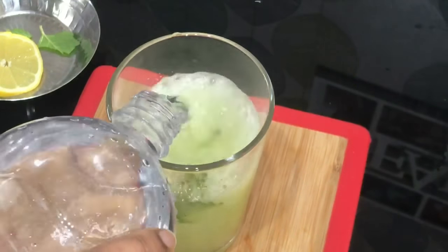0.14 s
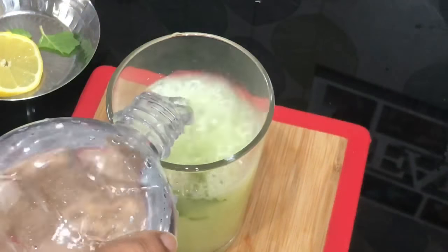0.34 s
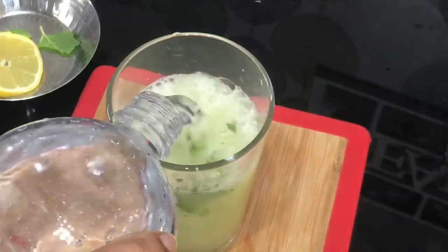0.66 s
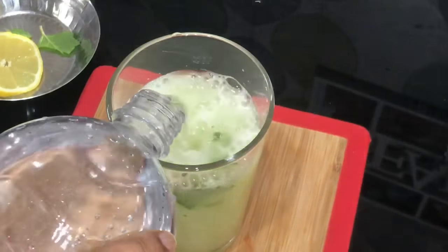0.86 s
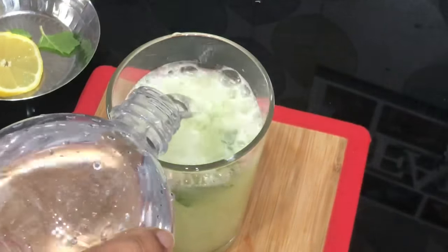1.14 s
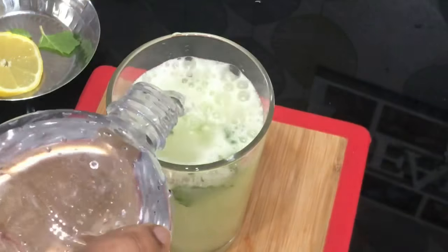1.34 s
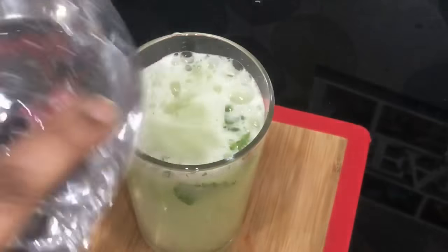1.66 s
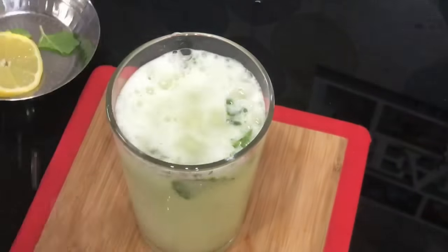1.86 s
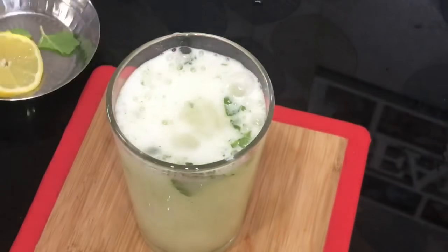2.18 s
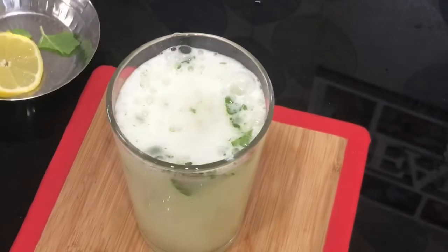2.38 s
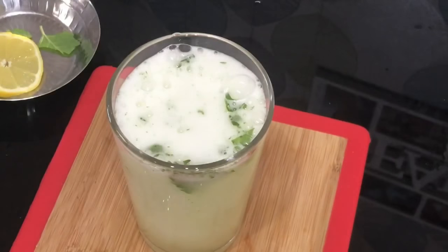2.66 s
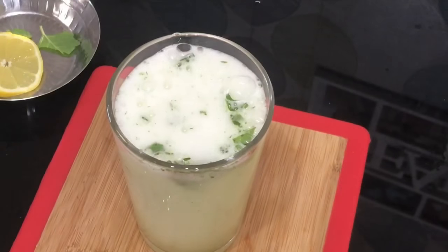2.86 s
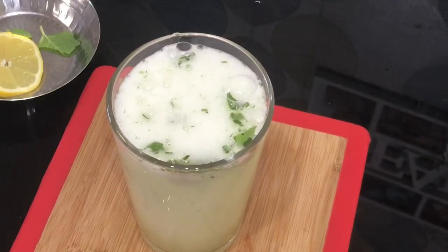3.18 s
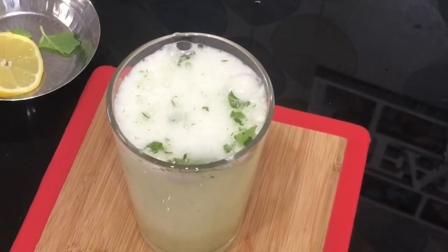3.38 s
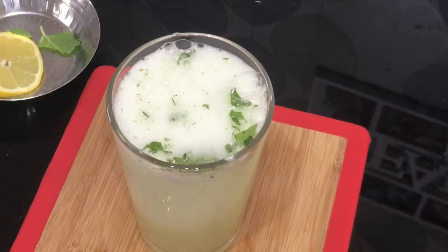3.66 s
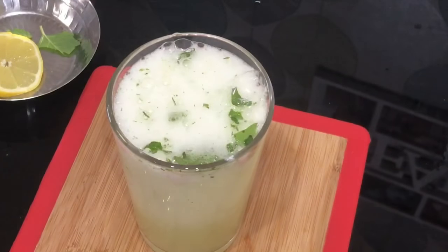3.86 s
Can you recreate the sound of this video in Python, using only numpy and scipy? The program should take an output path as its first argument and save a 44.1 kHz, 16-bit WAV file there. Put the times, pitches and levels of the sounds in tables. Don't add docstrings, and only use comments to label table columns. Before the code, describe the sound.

A soft plastic bottle pours sparkling water into a glass at arm's length: bubbly splash, droplets, soft hollow glugs, dents popping. Pouring stops, the foam head fizzes finely, and the handled bottle pops and knocks. Near the end come much louder crunching plastic cracks, with a short bright ring from hard tiles, over faint counter thumps and low kitchen rumble.

```python
import sys
import numpy as np
from scipy import signal
from scipy.fft import rfft, irfft
from scipy.io import wavfile
from scipy.ndimage import uniform_filter1d

SR = 44100
rng = np.random.default_rng(int(sys.argv[2]) if len(sys.argv) > 2 else 0)


def int16_out(signal):
    q = np.round(np.clip(np.atleast_2d(signal).T, -1, 1) * 32767)
    wavfile.write(sys.argv[1], SR, q.astype(np.int16))


def gain_from_db(level_db):
    decades = np.asarray(level_db, float) / 20
    return 10 ** decades


N = 177540


def unit(x):
    return x / np.sqrt(np.mean(x ** 2))


def peak_one(x):
    return x / np.abs(x).max()


def add(out, s, y):
    i = int(s * SR)
    out[i:i + len(y)] += y[:N - i]


def curve(tables, column=1, before=None, after=None):
    rows = np.concatenate(tables)
    return np.interp(np.arange(N) / SR, rows[:, 0], rows[:, column], before, after)


def swells(rows, rise=0.0012):
    t = np.arange(N) / SR
    gains = []
    for s, db, t60 in rows:
        age = np.maximum(t - s, 0)
        gains.append(gain_from_db(db - 60 * age / t60) * (1 - np.exp(-age / rise)))
    return np.max(gains, axis=0)


def colour(x, points):
    hz, db = np.transpose(points)
    f = np.maximum(np.arange(len(x) // 2 + 1) * SR / len(x), 1)
    gain = gain_from_db(np.interp(np.log(f), np.log(hz), db, left=-90, right=-90))
    return unit(irfft(rfft(x) * gain, len(x)))


def band(x, hz, spread):
    edges = [hz / spread, min(hz * spread, .45 * SR)]
    return signal.sosfilt(signal.butter(2, edges, "band", fs=SR, output="sos"), x)


def walk(rate):
    k = int(SR / rate)
    held = np.repeat(rng.standard_normal(N // k + 1), k)
    return uniform_filter1d(uniform_filter1d(held, k), k)[:N]


def grains(scatter_db):
    clicks = np.clip(rng.standard_normal(N), -2, 2)
    return clicks * gain_from_db(scatter_db * np.minimum(rng.exponential(size=N), 6))


def ring(modes, glide=0.):
    t = np.arange(SR // 2) / SR
    y = 0
    for hz, db, t60 in modes:
        bend = 1 + glide * np.minimum(t / t60, 1)
        y = y + gain_from_db(db - 60 * t / max(t60, 1e-3)) * np.sin(2 * np.pi * hz * t * bend)
    return peak_one(y)


def burst(t60, rise=0.0001):
    t = np.arange(SR // 4) / SR
    grit = rng.standard_normal(len(t)) * gain_from_db(3 * np.minimum(rng.exponential(size=len(t)), 5))
    y = unit(grit) * gain_from_db(-60 * t / max(t60, 1e-3)) * (1 - np.exp(-t / rise))
    y[8] += 6.
    return y


def wall_pops(events, wall):
    out, t = np.zeros(N), np.arange(SR // 2) / SR
    lucks = rng.standard_normal((len(events), 16))
    for (s, db, hz, t60, thump_db, snap_db), luck in zip(events, lucks):
        modes = [(f * (1 + 0.049 * a), g + 2 * b, d) for (f, g, d), a, b in zip(wall, luck, luck[8:])]
        thump = ring(modes + [(400.0, 2.4, 0.049)])
        tone = ring([(hz, 0, t60), (0.98 * hz, -6, 0.63 * t60)])
        onset = 1 - np.exp(-t / 0.0012)
        add(out, s - .0005, gain_from_db(db) * (gain_from_db(-2.5) * tone + gain_from_db(thump_db) * thump) * onset)
        crackle = band(burst(1.63 * t60), hz, 1.27)
        add(out, s - .0005, gain_from_db(db - 7) * peak_one(crackle))
        snap = band(band(burst(0.028, rise=0.001), 6000, 2.2), 6000, 2.2)
        add(out, s - .0003, gain_from_db(db + snap_db) * peak_one(snap))
    return out


# (time [s], peak [dB], pitch [Hz], thump [dB], snap [dB])
POUR_POPS = [(0.082, -29.5, 1180, -9.5, -6), (0.106, -29, 1105, -14, -28), (0.277, -29.5, 1084, 5.5, 4.5),
             (0.344, -29, 1204, -10, -15.5), (0.433, -39.5, 1180, 0.5, -14), (0.459, -42, 1090, -9, -25),
             (0.533, -45, 1620, -26, -2), (0.578, -42, 1300, -26, -2), (0.594, -37, 1440, -5.5, -2),
             (0.6999, -42, 2620, -32, -20), (0.844, -43, 2965, -27, -2), (0.873, -32, 1120, -11, -7.5),
             (0.932, -46, 1590, -13, -14), (1.015, -50, 1270, -26, 5), (1.05, -51, 1310, -22, 5),
             (1.107, -44, 1590, -24, -4), (1.134, -38.5, 1370, -5.5, -0.5), (1.189, -44.5, 1160, 0.5, -20),
             (1.222, -44, 1030, -20, -17), (1.236, -45, 1050, -5.5, -12), (1.475, -48.5, 2400, -37, -19)]
# (frequency [Hz], level [dB], t60 [s])
FULL_WALL = [(202.5, -1.5, 0.19), (345, -1, 0.17), (265, -2, 0.12), (426, -0.5, 0.09), (538, -17, 0.26),
             (643, -10, 0.15), (1346, -5, 0.048), (1400, -12, 0.082)]


def pouring_pops():
    ring_t60_s = 0.015
    rows = [(s, db, hz, ring_t60_s, thump_db, snap_db) for s, db, hz, thump_db, snap_db in POUR_POPS]
    return wall_pops(rows, FULL_WALL)


# (time [s], peak [dB], pitch [Hz], ring t60 [s], thump [dB])
LIFT_POPS = [(1.722, -62, 835, 0.02, 20.5), (1.749, -41.5, 1090, 0.012, -6.5),
             (1.777, -35, 1234, 0.0061, -21), (1.809, -30.5, 2170, 0.0062, -17),
             (1.913, -46, 4700, 0.012, -23), (1.942, -43, 3450, 0.022, 0), (1.949, -35.5, 1030, 0.034, -32),
             (2.0179, -26.5, 2020, 0.018, -21), (2.076, -32.5, 1520, 0.0089, -7),
             (2.1698, -31, 1240, 0.022, -44), (2.2, -43.5, 2054, 0.039, -21), (2.559, -37, 1225, 0.036, 4),
             (2.622, -44, 1590, 0.015, -5.5), (2.726, -51.5, 1360, 0.022, 0),
             (2.8431, -35.5, 1400, 0.0069, -1), (2.975, -41.5, 1400, 0.022, 2),
             (2.989, -32.5, 970, 0.0079, -7.5), (2.999, -39, 706, 0.008, -11)]
# (frequency [Hz], level [dB], t60 [s])
EMPTY_WALL = [(343.6, 12.5, 0.073), (230.7, 12.5, 0.07), (446.7, 10, 0.047), (588, -23, 0.054),
              (756, -8, 0.12), (954, 1.5, 0.1), (1460, -1, 0.12)]


def lifting_pops():
    turns_away_s, near_snap_db, far_snap_db = 2.05, -4, -22
    rows = [(*row, near_snap_db if row[0] < turns_away_s else far_snap_db) for row in LIFT_POPS]
    return wall_pops(rows, EMPTY_WALL)


# (time [s], peak [dB], pitch [Hz], length t60 [s], crunch [dB])
CREASE_POPS = [(3.135, -38.5, 716, 0.025, -26), (3.146, -37.5, 840, 0.023, -6),
               (3.21, -44, 2430, 0.022, -10), (3.333, -43, 1300, 0.023, 6), (3.3443, -38, 1000, 0.026, 7.5),
               (3.381, -35.5, 715, 0.012, -8), (3.396, -26.5, 780, 0.0128, -6),
               (3.462, -38.5, 780, 0.024, -23), (3.4835, -39, 2900, 0.027, 6.5),
               (3.537, -35.5, 870, 0.012, -2), (3.544, -39, 890, 0.0068, 0), (3.621, -40, 645, 0.0096, -4),
               (3.632, -33.5, 628, 0.012, 4), (3.65, -47, 700, 0.011, 15.5),
               (3.694, -40.5, 860, 0.014, -17), (3.715, -44, 670, 0.024, 8.5),
               (3.7352, -27.5, 690, 0.025, 9.5), (3.7392, -12, 2620, 0.0087, -10.5),
               (3.849, -25.5, 2610, 0.028, -6), (3.859, -44, 1280, 0.0082, 6)]
# (time [s], peak [dB], pitch [Hz], length t60 [s], crunch [dB])
FOLD = [
    (3.1745, -26, 800, 0.013, 5),
    (3.183, -19, 1550, 0.017, 3),
    (3.1860, -19.5, 955, 0.017, 5.5),
    (3.1864, -14.5, 3280, 0.0067, -11),
    (3.1882, -12.5, 2350, 0.016, -9),
    (3.335, -46, 2500, 0.027, 7.5),
]
# (time [s], peak [dB], pitch [Hz])
KNOCKS = [(3.118, -42.5, 306), (3.137, -37, 172), (3.175, -21.5, 260), (3.185, -26, 301), (3.191, -21, 345),
          (3.248, -36, 169), (3.393, -35, 345), (3.495, -33, 344), (3.54, -39, 345), (3.622, -42.5, 340),
          (3.696, -38, 300), (3.736, -25, 259), (3.776, -35.5, 345), (3.818, -48, 330), (3.844, -44.5, 360),
          (4.02, -38, 147)]
# (frequency [Hz], width [Hz], level [dB])
CRUNCH = [(926, 54, -18), (1656, 52, -2), (1780, 28, -9), (2100, 58, -8), (2225, 37, -12), (2445, 65, 3),
          (2630, 60, -5), (2780, 89, -15), (2900, 34.5, -14), (3180, 120, -7), (3420, 40, -5.5),
          (3614, 35, -3), (3816, 70, -2.5), (4220, 36, -16)]


def creases():
    snap_offset_db, snap_per_db = -8.5, 2.8
    knock_t60_s = 0.11
    crunch, out, t = np.zeros(N), np.zeros(N), np.arange(SR // 2) / SR
    for s, db, hz, t60, crunch_db in list(CREASE_POPS) + list(FOLD):
        add(out, s - .0006, gain_from_db(db) * peak_one(band(burst(t60), hz, 1.26)))
        add(crunch, s - .0006, gain_from_db(db + crunch_db + 1.5) * burst(3.1 * t60))
        snap = peak_one(band(burst(0.0136, rise=0.000099), 8350, 1.114))
        add(out, s - .0003, gain_from_db(db + snap_offset_db + snap_per_db * db) * snap)
    for (s, db, hz), luck in zip(KNOCKS, rng.standard_normal((len(KNOCKS), 8))):
        wall = [(f, g - 8 + 2 * a, d) for (f, g, d), a in zip(EMPTY_WALL, luck)]
        knock = ring([(hz, 0, knock_t60_s), (185, -3, .12), (140, -7, .15)] + wall)
        add(out, s - .001, gain_from_db(db) * knock * (1 - np.exp(-t / 0.00072)))
    cluster = sum(gain_from_db(db) * band(crunch, hz, 1 + width / hz) for hz, width, db in CRUNCH)
    body = gain_from_db(-3.5) * band(crunch, 1310, 2.24)
    fizz = gain_from_db(-21.0) * band(crunch, 6800, 1.9)
    return out + cluster + body + fizz


# (time [s], peak [dB])
TICKS = [(0.872, -19), (1.132, -45), (1.474, -25), (1.748, -24.5), (1.776, -23.5), (1.81, -12.5),
         (2.075, -18), (2.559, -14.5), (2.988, -21), (3.1889, 3), (3.488, -17), (3.7389, -1),
         (3.848, -39.5)]


def ticks():
    out = np.zeros(N)
    stiff = [row[:3] for table in (POUR_POPS, LIFT_POPS, CREASE_POPS, FOLD) for row in table]
    stiff = np.array(stiff)
    for s, db in TICKS:
        hz = stiff[np.argmin(np.abs(stiff[:, 0] - s)), 2]
        add(out, s - .0004, gain_from_db(db - 19.0) * peak_one(band(burst(0.0042), hz, 2)))
    return out


# (time [s], peak [dB], pitch [Hz], rattle t60 [s])
FACETS = [(2.0175, -38, 13500, 0.028), (2.075, -45, 6000, .02), (2.17, -46, 6230, 0.019),
          (3.1731, -31, 4250, .03), (3.1736, -35, 7760, .02), (3.182, -35, 5800, 0.016),
          (3.1853, -23, 8500, 0.014), (3.187, -36, 12800, .015), (3.192, -40, 5730, 0.2),
          (3.198, -39, 8300, .06), (3.7342, -31, 4820, 0.025), (3.7346, -30, 7900, 0.016),
          (3.7347, -33.5, 11700, 0.021), (3.7374, -41, 7940, .03), (3.741, -45, 5920, .12),
          (3.743, -43, 11800, .06), (3.849, -47, 8000, .03)]


def facets():
    out = np.zeros(N)
    for s, db, hz, t60 in FACETS:
        rattle = band(band(burst(t60, rise=0.000166), hz, 1.11), hz, 1.11)
        add(out, s - .0003, gain_from_db(db) * peak_one(rattle))
    return out


# (time [s], peak [dB], pitch [Hz], t60 [s])
AIR = [(0.085, -52.5, 142.1, 0.35), (0.28, -37.5, 142.4, 0.27), (0.43, -51.5, 140, 0.33),
       (0.598, -54.5, 141.6, 0.5), (0.878, -49, 142.2, 0.44), (1.137, -56, 128.4, 0.41),
       (1.761, -62.5, 187, 0.39), (1.94, -59.5, 188.8, 0.23), (2.03, -52, 198.4, 0.277),
       (2.119, -57.5, 188.5, 0.91), (2.559, -52, 183.8, 0.35), (2.66, -55, 174.6, 0.39),
       (2.839, -40, 187.5, 0.06), (2.969, -51, 156, 0.15)]


def air():
    s, db, hz, t60 = np.transpose(AIR)
    gulp = np.maximum(np.searchsorted(s, np.arange(N) / SR) - 1, 0)
    phase = 2 * np.pi * np.cumsum(hz[gulp] * (1 + 0.025 * walk(29.36))) / SR
    level = swells(zip(s, db, t60), rise=0.01) * gain_from_db(1.5 + 0.5 * walk(24.8))
    return np.sqrt(2) * np.sin(phase) * level


# (time [s], peak [dB],
# pitch [Hz], length [cycles])
PLINKS = [(0.0397, -39.5, 3560, 11.5), (0.0947, -50, 7000, 3), (0.1206, -25.5, 8900, 3.7),
          (0.1498, -30, 5500, 3.5), (0.1677, -30, 6300, 2.6), (0.1894, -47, 7000, 12),
          (0.204, -32.5, 4300, 3.6), (0.2237, -38, 3420, 19), (0.2424, -46, 3780, 8.0),
          (0.3955, -53, 7100, 6.2), (0.4052, -28.5, 3820, 13), (0.4378, -30, 8300, 2.5),
          (0.4515, -28.5, 5230, 7.7), (0.543, -52, 3970, 4.3), (0.7192, -43, 11200, 8.0),
          (0.9554, -41, 3640, 3.6), (1.0883, -43, 6560, 10), (2.0417, -27, 8790, 3),
          (2.1056, -38.5, 4700, 9.5), (2.5585, -35, 3030, 11), (2.57, -36, 2600, 6.3)]
# (time [s], peak [dB], pitch [Hz], length [cycles])
NECK_TAP = [
    (2.015, -38, 3000, 12.),
    (2.02, -40, 4000, 18.),
    (2.019, -40, 12000, 60.),
    (2.019, -41, 5500, 18.),
    (2.558, -41, 4700, 10.),
    (.2775, -38, 13000, 15.),
    (.412, -44, 3900, 22.),
]


def plinks():
    out, t = np.zeros(N), np.arange(SR // 2) / SR
    stray = [(1.1 * a, -63 + 8 * b, 3000 * 3.5 ** c, 5.) for a, b, c in rng.random((70, 3))]
    for s, db, hz, cycles in list(PLINKS) + list(NECK_TAP) + stray:
        tone = ring([(hz, 0, 3 * cycles / hz), (0.67 * hz, -8, cycles / hz)], glide=0.011)
        add(out, s - .0003, gain_from_db(db) * tone * (1 - np.exp(-t * hz / 0.46)))
        add(out, s, gain_from_db(db - 16.0) * peak_one(band(burst(0.049), hz, 1.63)))
    return out


# (time [s], peak [dB], pitch [Hz], length [cycles])
SPRAY = [(.049, -60, 5500, 3.6), (.054, -51, 1400, 2.4), (.0715, -45, 8340, 7), (.082, -50, 9300, 9),
         (.095, -45, 9200, 5.7), (.0955, -45, 4800, 3.7), (.1085, -36, 14700, 9), (.1085, -37, 8500, 4.2),
         (.1195, -37, 14300, 12.5), (.1195, -37, 12060, 10), (.1195, -38, 6800, 6.6), (.155, -46, 4600, 4),
         (.1675, -46.5, 9200, 5.4), (.192, -45, 8500, 6), (.196, -55, 5430, 4), (.2045, -43, 6600, 7),
         (.242, -52, 1400, 4.1), (.3988, -52, 3300, 3), (.3988, -43, 7000, 4), (.405, -42, 7000, 5.5),
         (.4325, -40, 7300, 6), (.4325, -37, 5000, 4.4), (.437, -38.5, 9300, 7.8), (.4372, -37, 5300, 8.5),
         (.44, -49, 7400, 34), (.4518, -41, 9460, 5), (.4525, -39.5, 1480, 3.6), (.453, -43, 3600, 5),
         (.471, -49, 8800, 5.6), (.529, -52, 2360, 3.3), (.553, -49, 4600, 3.7), (.5625, -47, 6800, 9),
         (.568, -55, 3900, 6), (.572, -45, 4200, 3.5), (.618, -45.5, 3500, 2.6), (.618, -42.5, 1470, 3.4),
         (.627, -49, 1350, 2.4), (.631, -48, 1510, 3.16), (.679, -50, 6560, 5), (.694, -48, 2100, 1.4),
         (.724, -54, 1517, 3.2), (.766, -59, 1400, 4), (.799, -51, 5500, 5), (.858, -47, 1690, 7.3),
         (.859, -49, 3700, 4), (.863, -51, 1090, 3)]
# (time [s], peak [dB], pitch [Hz], length [cycles])
DRIPS = [(1.9145, -47, 4780, 15), (1.915, -52, 6540, 22), (1.921, -49, 2180, 9.6), (1.9215, -51, 2900, 19),
         (1.921, -50.5, 4000, 12), (1.921, -49, 5800, 14), (1.927, -46.5, 5400, 23),
         (1.928, -50.5, 6990, 14), (1.931, -45.5, 2920, 17.4), (1.941, -49, 3636, 18),
         (1.949, -43, 6000, 32), (1.956, -54, 1050, 5.1), (2.005, -51, 6500, 3.7), (2.0175, -37, 3020, 18),
         (2.021, -43, 3930, 29), (2.022, -39, 1250, 9.2), (2.0415, -46, 5040, 4), (2.843, -46, 2560, 4)]
# (time [s], peak [dB], pitch [Hz], length [cycles])
CLICKS = [(3.1882, -11.5, 2460, 3.1), (3.315, -40, 2630, 13), (3.3235, -32, 2100, 1.5),
          (3.33, -40, 3660, 9), (3.341, -38, 2670, 6.7), (3.3465, -31.5, 2500, 8.6),
          (3.3875, -33, 950, 1.8), (3.463, -43, 2600, 3.6), (3.488, -26.5, 3000, 1.5),
          (3.525, -36, 3200, 2.6), (3.538, -37, 3160, 2.2), (3.5435, -35, 3260, 3.3), (3.621, -41, 2440, 8),
          (3.632, -37, 1970, 1.1), (3.635, -39, 2850, 9), (3.655, -38, 1400, 2), (3.704, -35.5, 1520, 2.7),
          (2.999, -39, 1610, 1.4), (2.845, -48, 700, 2.6), (2.812, -51.5, 294, 2)]
# (time [s], peak [dB], pitch [Hz], length [cycles])
GLUGS = [(.082, -49.5, 463, 24), (.106, -44, 1310, 38), (.11, -53, 632, 38), (.28, -49, 1297, 79),
         (.45, -44.5, 1073, 37), (.594, -38.5, 1130, 10), (.594, -42.5, 1570, 25), (.875, -50.5, 343.5, 26),
         (1.01, -63, 1310, 100), (1.134, -53, 317, 14), (1.19, -50.5, 515, 23), (1.19, -54, 1680, 16),
         (1.225, -57, 1055, 80), (2.1695, -37.5, 1235, 31), (2.56, -51.5, 344, 32), (2.36, -56, 490, 7.3)]


def spray():
    rise_cycles = 0.52
    out, t = np.zeros(N), np.arange(SR // 2) / SR
    for s, db, hz, cycles in list(SPRAY) + list(DRIPS) + list(CLICKS) + list(GLUGS):
        tone = ring([(hz, 0, 3 * cycles / hz), (1.1 * hz, -9, 0.73 * cycles / hz)])
        tone = tone * (1 - np.exp(-t * hz / rise_cycles))
        add(out, s - .0004, gain_from_db(db) * peak_one(tone))
    return out


# (time [s], peak [dB])
SPLASH = [
    (0.018, -61.5),
    (0.09, -55),
    (0.3, -61),
    (0.43, -55.5),
    (0.591, -57),
    (0.88, -59.5),
    (1.006, -67),
    (1.19, -63),
]
# (frequency [Hz], level [dB per Hz])
SPLASH_COLOUR = [(300, -25), (500, -13), (800, -3), (1050, 0.5), (1500, 4.5), (1900, -11), (3500, -10),
                 (6000, -44)]


def splash():
    surge_t60_s = 0.43
    flow = swells([(s, db - 0.5, surge_t60_s) for s, db in SPLASH])
    churn = grains(3.6) * gain_from_db(4 * walk(70))
    return colour(churn, SPLASH_COLOUR) * flow


# (time [s], level [dB], thickness [0-1]); thick foam holds bigger, lower bubbles
FOAM = [
    [(0.0, -64.5, 0.57), (0.728, -62.5, 0.44), (1.158, -60, 0.31), (1.72, -58, 0.5)],
    [(1.74, -57, 0.58), (1.98, -55, 0.52), (2.71, -56.5, 0.82), (4.03, -56, 0.9)],
]
# (frequency [Hz], level [dB per Hz])
THIN_FOAM = [(880, -52), (1500, -24), (2300, -42), (2590, -16), (2860, -25), (3520, -11), (4330, -20),
             (4970, -14), (5830, -5), (9010, 0.5), (10500, -5), (11200, 1), (13000, -0.5), (15100, -0.5),
             (16000, -23)]
# (frequency [Hz], level [dB per Hz])
THICK_FOAM = [(710, -31), (1200, -37), (1660, 2.5), (1750, -15), (2300, -3.5), (3360, -1.5), (3910, 2),
              (4960, -2.5), (6580, -0.5), (7740, -6), (8630, -3.5), (10100, -8.5), (13500, -9),
              (15200, -12), (16000, -8)]


def foam():
    flicker_db = 1.2
    swell = .35 * walk(5)
    bursts = 0
    for hz in 1000 * 2 ** np.arange(0, 4.3, .6):
        one_size = unit(band(grains(3.4), hz, 1.263)) * np.sqrt(hz)
        bursts = bursts + one_size * gain_from_db(swell + flicker_db * walk(60))
    thick = np.clip(curve(FOAM, column=2), 0, 1)
    mix = (1 - thick) * colour(bursts, THIN_FOAM) + thick * colour(bursts, THICK_FOAM)
    return mix * gain_from_db(curve(FOAM) + 0.1)


# (time [s], level [dB])
RUB = [
    [(1.62, -71), (1.73, -66), (1.94, -66), (2.06, -61), (2.45, -66), (3.1, -70), (3.2, -65), (3.86, -49.5),
     (3.93, -98)],
]
# (frequency [Hz], level [dB per Hz])
RUB_COLOUR = [(120, -4), (200, -5), (296, -3.5), (338, 1.5), (382, -2), (480, -6), (709, -1), (790, -7),
              (1050, -3), (1850, -9.5), (2480, -9.5), (3720, -12), (5000, -44), (6500, -29), (11000, -120)]


def rub():
    slip_db, slip_per_db, slip_t60_s = -37.5, 0.42, 0.42
    slips = grains(3.4) * gain_from_db(5 * walk(90))
    cracks = list(CREASE_POPS) + list(FOLD)
    after = swells([(s, slip_db + slip_per_db * db, slip_t60_s) for s, db, *_ in cracks])
    return colour(slips, RUB_COLOUR) * np.hypot(gain_from_db(curve(RUB, before=-120)), after)


# (frequency [Hz], level [dB], t60 [s])
ROOM = [(480, -20.5, 0.061), (1110, -19, 0.26), (3180, -16, 0.21), (7400, -13, 0.19)]


def echo(x):
    t = np.arange(SR // 2) / SR
    onset = np.clip((t - .003) / 0.0038, 0, 1)
    tail = 0
    for hz, db, t60 in ROOM:
        part = band(rng.standard_normal(len(t)), hz, 2.36) * gain_from_db(-60 * t / t60) * onset
        tail = tail + gain_from_db(db) * band(part, hz, 1.81) / np.sqrt(np.sum(part ** 2))
    return signal.fftconvolve(x, tail)[:N]


# (time [s], peak [dB])
RUMBLE = [
    (0.0, -60),
    (0.3, -49),
    (0.9, -69),
    (1.28, -60),
    (1.76, -59),
    (2.04, -62),
    (2.93, -79),
    (3.18, -55),
    (3.46, -63),
    (3.98, -78),
]


def rumble():
    jolts = swells([(s, db + 4.0, 0.45) for s, db in RUMBLE], rise=0.029)
    throb = unit(band(band(rng.standard_normal(N), 57.0, 1.38), 57.0, 1.38))
    steady_db = -74.5
    return throb * np.hypot(gain_from_db(steady_db), jolts)


# (frequency [Hz], level [dB per Hz])
KITCHEN = [(12, -16), (20, -3), (55, -0.5), (192, -5.5), (440, -13.5), (538, -11), (659, -15), (987, -15),
           (2210, -25), (2500, -28), (3250, -45), (5500, -120)]


def kitchen():
    level_db = -66.5
    hum = 0
    for hz in 25 * 2. ** np.arange(8):
        octave = unit(band(rng.standard_normal(N), hz, 1.66)) * np.sqrt(hz)
        hum = hum + octave * gain_from_db(0.3 * walk(3.45))
    return colour(hum, KITCHEN) * gain_from_db(level_db)


def scene():
    sharp = pouring_pops() + lifting_pops() + creases() + ticks() + plinks()
    sharp = signal.sosfilt(signal.butter(2, 110, "high", fs=SR, output="sos"), sharp)
    bottle = sharp + facets() + air() + rub()
    water = spray() + splash() + foam()
    return (bottle + water + echo(sharp) + rumble() + kitchen())[None]


def band_limit(x):
    return signal.sosfilt(signal.butter(12, 16630, fs=SR, output="sos"), x)


def record(dry):
    mix = signal.sosfilt(signal.ellip(8, .2, 70, 16000, fs=SR, output="sos"), dry)
    return band_limit(mix)


dry = scene()
out = record(dry)
int16_out(out)
```